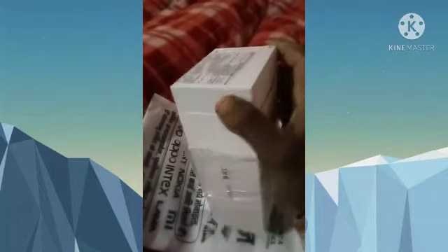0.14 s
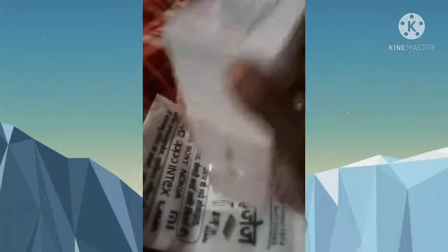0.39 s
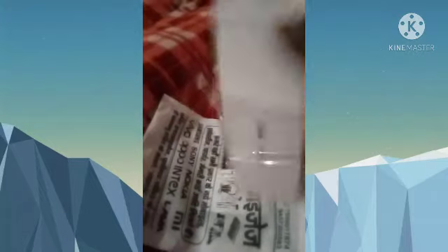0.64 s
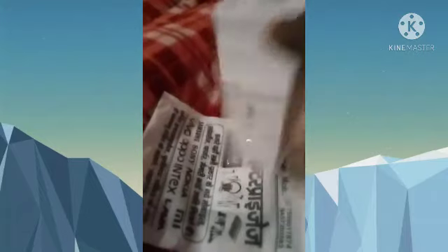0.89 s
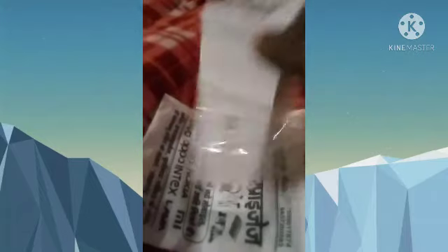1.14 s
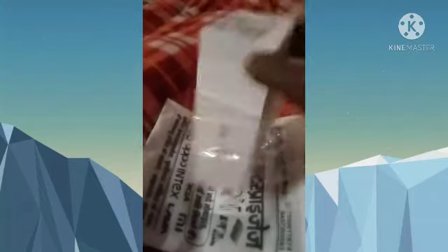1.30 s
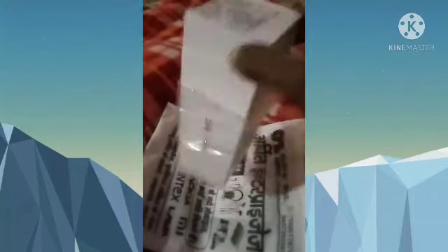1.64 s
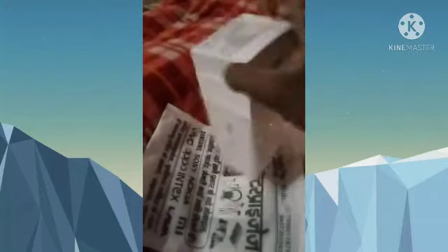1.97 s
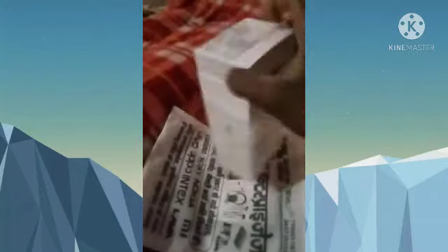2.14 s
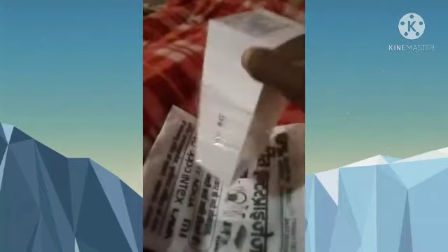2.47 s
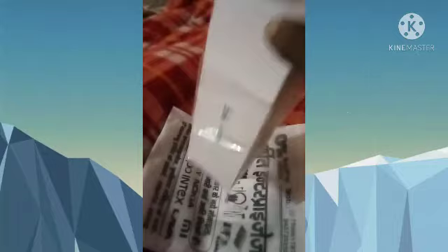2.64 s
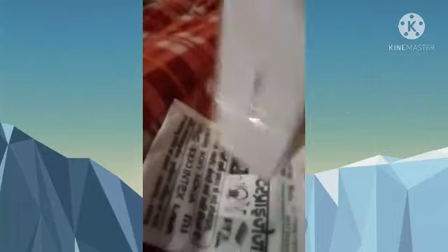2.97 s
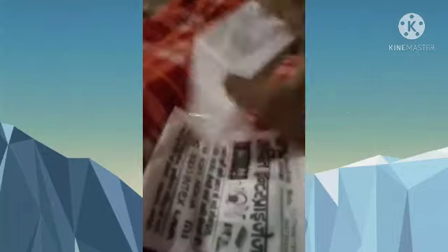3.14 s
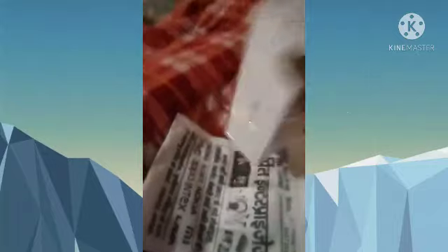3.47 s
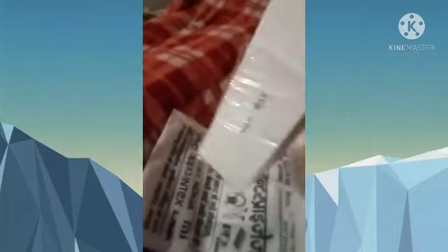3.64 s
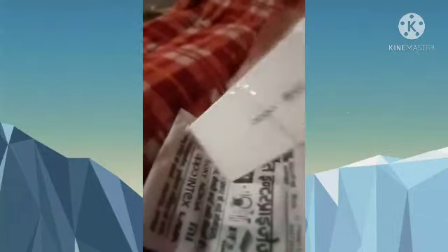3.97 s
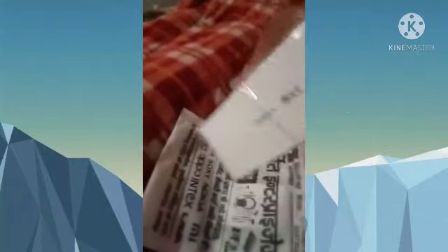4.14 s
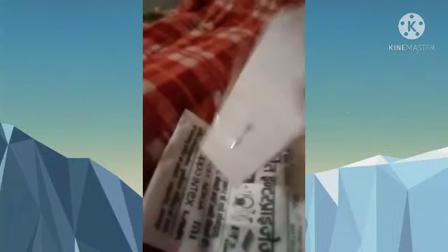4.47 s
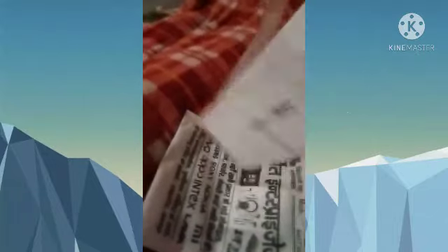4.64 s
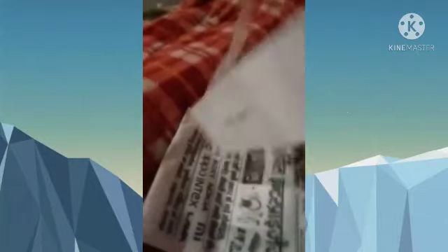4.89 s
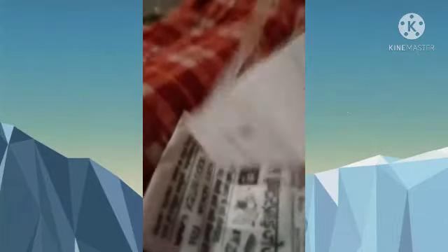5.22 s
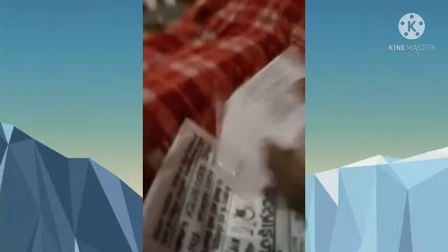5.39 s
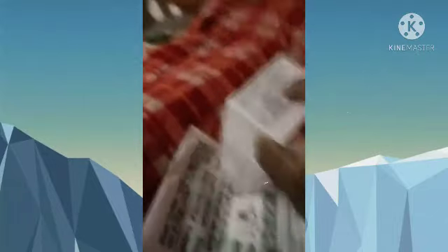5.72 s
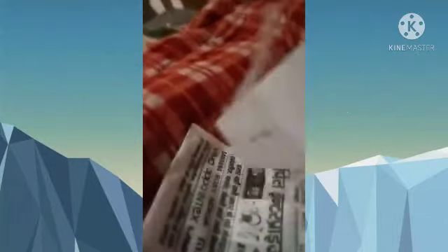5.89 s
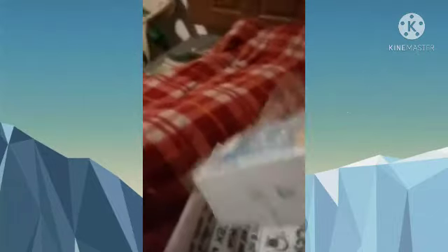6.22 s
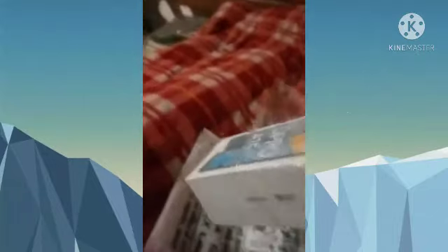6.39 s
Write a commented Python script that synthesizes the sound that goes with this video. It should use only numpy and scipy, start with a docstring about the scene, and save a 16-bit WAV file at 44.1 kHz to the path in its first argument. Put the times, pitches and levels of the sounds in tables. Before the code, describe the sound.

Plastic wrap snaps and crackles sharply as a small box is turned, then its contents knock and rattle in quick hollow shakes, close up indoors.

```python
"""A small cardboard box in plastic wrap is turned and shaken over a newspaper, close by in a small room.
Snaps of the taut wrap are short gliding sines with a noise crack and a tap on the box.
Shaken contents hit the wall: noise bursts drive the box modes and coloured slap, clack and rattle.
Wrap and paper rustle as flickering noise and clicks, with room echoes over a faint steady noise floor."""
import sys
import numpy as np
from scipy import signal
from scipy.fft import rfft, irfft
from scipy.io import wavfile
from scipy.ndimage import uniform_filter1d

SR = 44100
rng = np.random.default_rng(int(sys.argv[2]) if len(sys.argv) > 2 else 0)


def put_to_file(sound):
    """Save the sound as 16-bit audio at rate SR, in the file named by the first command-line argument."""
    columns = np.atleast_2d(sound).T  # one column per channel
    safe = np.clip(columns, -1, 1)
    whole_steps = np.round(safe * 32767)
    wavfile.write(sys.argv[1], SR, whole_steps.astype(np.int16))


N = 289724
TIME = np.arange(N) / SR
AGE = TIME[:4096]   # time since a contact


# Loud snaps of the wrap, levels before trim: (time [s], ring peak level [dB], mid-glide ring frequency [Hz],
# box tap level [dB], crack level [dB], ring decay time before its floor in facet [s])
WRAP_SNAPS = [(0.2533, -30, 3180, -65, -44.5, .0008), (0.406, -28, 3100, -51, -45, 0.00039),
              (0.449, -34, 3300, -44, -48, .0009), (0.5117, -35, 3060, -46, -42, 0.00098),
              (0.6095, -24.5, 3070, -51, -47, 0.00069), (0.622, -22, 2970, -29, -25.5, .0008),
              (0.7471, -19, 3040, -34, -29.5, 0.00089), (0.8129, -3.5, 3230, -21, -10, 0.0019),
              (0.9073, -18, 3070, -30, -42, .0008), (0.9785, -19, 3360, -55, -54, 0.00099),
              (0.9956, -22, 2960, -35, -32, .0009), (1.0008, -10, 2940, -19.5, -8.5, 0.00085),
              (1.077, -17.5, 3210, -51, -35, .0006), (1.0835, -12.5, 3350, -18, -35, .0009),
              (1.1475, -4, 3155, -31, -26, 0.0011), (1.2258, -11, 3320, -18.5, -25.5, .0008),
              (1.287, -14, 3360, -41, -55, 0.00075), (1.3012, -6, 3090, -27, -52, 0.0016),
              (1.311, -9, 3190, -21.5, -18.5, 0.00089), (1.3302, -22, 3380, -37, -30, .0009),
              (1.354, -16, 2650, -28.5, -55, .0005), (1.3839, -24, 3100, -29, -55, 0.00045),
              (1.4678, -5.5, 3270, -26.5, -30, 0.00033), (1.5237, -25, 3420, -38.5, -54, 0.0007),
              (1.5569, -28.5, 3630, -52, -56, 0.001), (1.5906, -25, 3390, -40, -59, 0.0015),
              (1.7628, -27.5, 3110, -41, -63, 0.00067), (1.862, -12, 3010, -28.5, -37, 0.00047),
              (1.9603, -17, 3250, -29, -55, .0005), (2.0433, -5, 2700, -18, -34, 0.0022),
              (2.0467, -5, 3060, -38, -16, 0.0014), (2.1327, -12.5, 3270, -23, -54, 0.0019),
              (2.2023, 0.5, 3110, -25, -15.5, 0.0011), (2.2423, -20.5, 2630, -50, -30, 0.0008),
              (2.2894, -9, 2870, -29, -58, 0.00027), (2.358, -16, 3030, -42.5, -41, 0.00073),
              (2.3657, -2.5, 3210, -22, -18.5, 0.00083), (2.3688, -4, 3290, -28, -26, 0.00068),
              (2.4566, -11, 3310, -27.5, -60, 0.00081), (2.5499, -8.5, 2610, -37, -61, 0.00085),
              (2.5545, -18, 2810, -29, -22, .001), (2.659, -26.5, 3270, -42, -79, .001),
              (2.9014, -31, 3720, -24, -32, 0.0007), (2.9316, -3, 2780, -13, -13.5, 0.00078),
              (2.996, -6.5, 3090, -22, -29, 0.00061), (3.1661, -24, 3100, -36, -28, 0.0011),
              (3.2142, -4, 2660, -15, -10, 0.00064), (3.2834, -14, 2350, -45, -27, 0.00031),
              (3.2966, -12, 2820, -24.5, -44, 0.00036), (3.4539, -2, 3090, -16.5, -21, 0.00083),
              (3.8708, -35, 3200, -47, -62, .0007), (5.7699, -14.5, 2940, -29.5, -13.5, 0.00091),
              (6.0854, -5.5, 1850, -18.5, -15.5, 0.0021)]
# Colour of the tap on the box: (frequency [Hz], gain [dB])
TAP_COLOUR = [(70, -21), (150, -5), (230, 4), (310, 2.5), (420, 8), (540, -6.5), (830, 1), (1200, -8.5),
              (1650, -4), (2300, -8.5), (4500, -41.5)]
# Colour of the cracking crease: (frequency [Hz], gain [dB])
CRACK_COLOUR = [(1500, -18.5), (3200, 9), (4200, 8.5), (5100, -7), (5900, 1.5), (6500, -2.5), (7300, 3),
                (8300, -6), (9500, -13), (13000, -21.5), (15000, -21)]


def snaps(rows, ring_trim_db, tap_trim_db, crack_trim_db, rough, rebound):
    """A facet of wrap buckles and springs back; the crease cracks and taps the box."""
    time_s, ring_db, ring_hz, tap_db, crack_db, decay_s = columns(rows)
    detune, lag_s = columns(rng.uniform([.8, .001], [1.1, .0025], (len(time_s), 2)))

    crease = peak_one(band(burst(time_s, decay_s=0.0036, rise_s=.0003), 2350, 3440))
    buckle = facet(ring_hz, decay_s, delay_s=0)
    spring_back = facet(ring_hz * detune, decay_s, lag_s)
    ring = from_db(ring_db + ring_trim_db) * peak_one(buckle + rebound * spring_back + rough * crease)

    crack = colour(burst(time_s, decay_s=0.00096, rise_s=0.00036), CRACK_COLOUR)
    tap = colour(burst(time_s, decay_s=0.0092, rise_s=0.00043), TAP_COLOUR)
    contact = at_level(crack, crack_db + crack_trim_db) + at_level(tap, tap_db + tap_trim_db)
    return place(time_s, ring + contact)


def facet(hz, decay_s, delay_s, glide=0.14):
    """A buckling facet of wrap swings for a few cycles, dropping in pitch as it slackens."""
    age_s = np.maximum(AGE - delay_s, 0)
    attack = 1 - np.exp(-(age_s / 0.00079) ** 2)
    swing = attack * np.exp(-age_s / np.maximum(decay_s, 3e-4))
    pitch_hz = hz * (1 + glide * (2 * np.exp(-age_s / 0.0016) - 1))
    return peak_one(swing) * np.sin(2 * np.pi * np.cumsum(pitch_hz, axis=1) / SR)


TURNING_S = (.4, 2.7)   # from, to
CRINKLES_PER_S, CRINKLE_HZ, CRINKLE_DECAY_S = 16, 3187, 0.00061
CRINKLE_OVER_RUSTLE_DB, CRINKLE_SPREAD_DB = 11, 3
CRINKLE_TAP_DB, CRINKLE_CRACK_DB = -18, -12   # relative to the ring, before trim


def crinkles(rustle_db):
    """Small snaps under the turning fingers, as rows like WRAP_SNAPS."""
    level_db = rustle_db + CRINKLE_OVER_RUSTLE_DB
    time_s, db = scatter(*TURNING_S, CRINKLES_PER_S, level_db, CRINKLE_SPREAD_DB)
    hz = CRINKLE_HZ * rng.uniform(.88, 1.12, len(time_s))
    decay_s = np.full(len(time_s), CRINKLE_DECAY_S)
    return np.column_stack([time_s, db, hz, db + CRINKLE_TAP_DB, db + CRINKLE_CRACK_DB, decay_s])


# Contents hit the wall, levels before trim: (time [s], wrap slap level [dB], wall thud level [dB],
# air boom level [dB], rattle level [dB], slap and rattle decay time [s])
WALL_KNOCKS = [(0.0217, -72, -39, -41, -77, 0.0052), (0.6837, -34.5, -27, -42, -38.5, 0.011),
               (1.4458, -40.5, -19.5, -29.5, -40, 0.0099), (2.9316, -2, -25.5, -36, -25.5, 0.0023),
               (3.2142, -0.5, -24, -43, -17.5, 0.0022), (3.311, -21.5, -14.5, -26.5, -54, 0.0041),
               (3.3291, -30, -23, -37, -56, 0.0094), (3.4285, -13.5, -10, -15, -52, 0.014),
               (3.4345, -19, -9, -30, -36, 0.0017), (3.5072, -6.5, -27, -16, -37, 0.0076),
               (3.5184, -12, -7.5, -21.5, -41, .0025), (3.5262, 2, -16.5, -19.5, -22, 0.002),
               (3.6105, -37, -25, -48, -52, .0025), (3.6557, -17, -20, -28, -36, 0.012),
               (3.7341, -18, -18.5, -42, -35, 0.0041), (3.7471, -19, -18.5, -29.5, -40, 0.0053),
               (4.1605, -39, -24, -50, -62, 0.017), (4.2358, -18.5, -19.5, -42, -35.5, 0.0049),
               (4.2524, -25, -24.5, -42, -58, 0.0027), (4.367, -25, -25.5, -33.5, -45, .003),
               (4.4265, -18, -18, -45, -25.5, 0.0052), (4.4421, 3, -13, -28, -22, 0.0024),
               (4.5002, -6, -20.5, -24, -21.5, 0.0052), (4.5998, -18, -24, -54, -44, 0.012),
               (4.7925, -11.5, -10, -60, -25, 0.0055), (4.8065, 1, -13, -20.5, -22.5, 0.0066),
               (4.8659, -6.5, -12.5, -17.5, -23.5, .008), (4.8982, -17, -22, -36, -43, 0.0035),
               (4.9204, -17, -20, -38, -41, 0.01), (4.9626, -37, -19, -43, -56, 0.0028),
               (5.1014, -19.5, -24, -35, -26, 0.0018), (5.1172, 2, -7, -36, -17, 0.0049),
               (5.1755, -8, -16, -24.5, -28, 0.0084), (5.2066, -22, -19.5, -28, -47, 0.0038),
               (5.2293, -14, -18, -27, -37, 0.0056), (5.3993, 0.5, -10.5, -22, -14.5, 0.0047),
               (5.4615, -9, -17, -17, -27.5, .009), (5.4909, -14, -16.5, -22, -29, 0.0033),
               (5.5323, -18.5, -16, -38, -44, 0.0066), (5.5737, -18.5, -23, -43, -37.5, 0.0042),
               (5.7699, -1, -9, -22, -17.5, 0.0043), (5.8211, -10, -12, -19, -30, 0.011),
               (5.896, -10.5, -14.5, -35, -36, 0.0043), (6.044, -20, -23, -32.5, -47, 0.0027),
               (6.0616, -18.5, -12.5, -23, -43, 0.02), (6.1316, -12.5, -13, -21.5, -27, 0.013),
               (6.1927, -17.5, -16, -28, -39, 0.0042), (6.2162, -8.5, -21.5, -26, -31.5, 0.0041)]
# Box walls: (frequency [Hz], width [Hz], mean level [dB])
WALL_MODES = [(204.7, 32, -6), (279.4, 34.5, -3), (330, 15, 0.5), (382.4, 24, 1), (431, 27.3, -3.5),
              (585, 14.3, -13.5)]
# Air inside the box: (frequency [Hz], width [Hz], mean level [dB])
AIR_MODES = [(145, 26, -2)]
# Colour of the slapping wrap: (frequency [Hz], gain [dB])
SLAP_COLOUR = [(900, -12), (1900, -13), (2400, 0), (3100, -1), (3900, -5.5), (5000, -25.5), (8000, -44.5)]
# Colour of the clacking card: (frequency [Hz], gain [dB])
CLACK_COLOUR = [(300, -12), (560, 1.5), (690, -2.5), (830, 5), (1000, -1.5), (1230, -7.5), (1700, 4.5),
                (2000, -3.5), (2800, -4), (5000, -75)]
# Colour of the loose parts: (frequency [Hz], gain [dB])
RATTLE_COLOUR = [(1500, -35), (3200, -9.5), (4200, 11.5), (5100, -0.5), (5900, 1), (6500, 2.5), (7300, 9),
                 (8300, -5.5), (9500, -36), (13000, -43), (15000, -25)]
CLACK_PER_SLAP, CLACK_PER_THUD = 0.56, .38   # dB per dB


def knocks(rows, slap_trim_db, clack_trim_db, thud_trim_db, boom_trim_db, rattle_trim_db):
    """The contents hit the wall: the wrap slaps, the card clacks, walls and air resound, loose parts rattle."""
    time_s, slap_db, thud_db, boom_db, rattle_db, decay_s = columns(rows)
    clack_db = CLACK_PER_SLAP * slap_db + CLACK_PER_THUD * thud_db

    slap = colour(burst(time_s, decay_s, rise_s=0.0013), SLAP_COLOUR)
    clack = colour(burst(time_s, 1.3 * decay_s, rise_s=0.00081), CLACK_COLOUR)
    thud = box(burst(time_s, decay_s=0.0028, rise_s=0.00027), WALL_MODES)
    boom = box(burst(time_s, decay_s=0.0042, rise_s=0.0008), AIR_MODES)
    rattle = colour(burst(time_s, decay_s, rise_s=0.00036), RATTLE_COLOUR)

    blow = at_level(slap, slap_db + slap_trim_db) + at_level(clack, clack_db + clack_trim_db)
    blow = blow + at_level(thud, thud_db + thud_trim_db) + at_level(boom, boom_db + boom_trim_db)
    return place(time_s, blow + at_level(rattle, rattle_db + rattle_trim_db))


def box(push, modes, vary_db=5.0):
    """The box rings in its low modes, each as strongly as the place of the push allows."""
    # a small box radiates little bass
    push = signal.sosfilt(signal.butter(2, 105, "high", fs=SR, output="sos"), push)
    out = 0
    for k, (hz, width_hz, db) in enumerate(modes):
        radius = np.exp(-np.pi * width_hz / SR)
        poles = [1, -2 * radius * np.cos(2 * np.pi * hz / SR), radius ** 2]
        ring = signal.lfilter([1 - radius, 0, radius - 1], poles, push)
        coupling = rng.uniform(-1, 1, push.shape[:-1] + (1,))   # random place of each push
        out = out + (-1) ** k * from_db(db + vary_db * coupling) * ring
    return out


SHAKING_S = (3.3, 6.4)   # from, to
BUMPS_PER_S, BUMP_SPREAD_DB, BUMP_DECAY_S = 10, 6, 0.0064
# relative to the rumble, before trim
BUMP_SLAP_DB, BUMP_THUD_DB, BUMP_BOOM_DB, BUMP_RATTLE_DB = 2.5, 3, -10.5, -5


def bumps(rumble_db):
    """Light bumps of the sliding contents, as rows like WALL_KNOCKS."""
    time_s, db = scatter(*SHAKING_S, BUMPS_PER_S, rumble_db, BUMP_SPREAD_DB)
    levels_db = db[:, None] + [BUMP_SLAP_DB, BUMP_THUD_DB, BUMP_BOOM_DB, BUMP_RATTLE_DB]
    return np.column_stack([time_s, levels_db, np.full(len(time_s), BUMP_DECAY_S)])


# Colour of paper and wrap: (frequency [Hz], gain [dB])
RUSTLE_COLOUR = [(300, -19), (560, -6), (830, 0.5), (1250, 2.5), (1700, -5.5), (2050, 6.5), (3000, 2.5),
                 (3800, -1), (4600, -13.5), (5400, -23), (8000, -69)]
# Colour of the wrap's hiss: (frequency [Hz], gain [dB])
HISS_COLOUR = [(2820, -23), (4800, -13.5), (6050, -14), (6900, 0.5), (7440, -2), (8110, -9), (10100, -20),
               (14900, -18), (16000, -4.5)]


def rubbing(levels_db, rumble_trim_db, rustle_trim_db, hiss_trim_db, crease_db):
    """The contents slide in the box; paper and wrap drag under the fingers and small creases give way in clumps."""
    rumble_gain, rustle_gain, hiss_gain = from_db(levels_db)
    grip = flutter(spread_db=4.0, rate_hz=170)
    drag = grip * rng.standard_normal(N)

    sliding = box(drag, WALL_MODES) + 0.99 * box(drag, AIR_MODES) + 0.59 * band(drag, 76, 726)
    rumble = from_db(rumble_trim_db) * rumble_gain * rms_one(sliding)

    clicks = [band(grains(per_s=110, spread_db=5.0), hz / 1.25, hz * 1.25)
              for hz in np.geomspace(900, 3600, 6)]
    creases = grip * sum(clicks)
    paper_and_wrap = rms_one(drag) + from_db(crease_db) * rms_one(creases)
    rustle = from_db(rustle_trim_db) * rustle_gain * rms_one(colour(paper_and_wrap, RUSTLE_COLOUR))

    sizzle = grip * rms_one(grains(per_s=1500, spread_db=4.0))
    hiss = from_db(hiss_trim_db) * hiss_gain * rms_one(colour(drag + sizzle, HISS_COLOUR))
    return rumble + rustle + hiss


def flutter(spread_db, rate_hz):
    """A grip that catches and lets go many times a second, as a random gain."""
    grip = np.clip(rng.standard_normal(4000), -2, 2)
    return from_db(spread_db * np.interp(TIME * rate_hz, np.arange(len(grip)), grip))


def grains(per_s, spread_db):
    """Clicks of uneven size at random moments."""
    sizes = from_db(spread_db * np.minimum(rng.exponential(1, N), 3)) * rng.choice([-1, 1], N)
    return sizes * (rng.random(N) < per_s / SR)


# Finger drags, then shaking strokes, levels before sag and trim:
# (end of swell [s], hold [s], rustle level [dB], box rumble level [dB], wrap hiss level [dB])
HAND_MOVES = [(0.06, 0.3, -50.5, -52, -59), (0.24, 0.13, -49, -53, -57.5),
              (0.39, 0.38, -49.5, -53.5, -48.5), (0.61, 0.27, -38.5, -42.5, -46),
              (0.72, 0.45, -37, -36, -47), (1.23, 0.16, -35.5, -37.5, -43.5), (1.45, 0.39, -50, -47, -57.5),
              (1.88, 0.39, -42.5, -42.5, -53.5), (2.06, 0.3, -39, -38, -46.5),
              (2.38, 0.24, -44, -44, -52.5), (2.81, 0.19, -47.5, -55.5, -59.5), (2.94, 0.12, -32, -35, -40),
              (3.225, 0.15, -29.5, -41.5, -42), (3.43, 0.12, -24.5, -27, -39.5),
              (3.6, 0.17, -36.5, -33.5, -61), (3.79, 0.036, -44, -46, -70), (3.99, 0.12, -54, -77, -74),
              (4.16, .05, -37.5, -34.5, -65), (4.225, 0.017, -28, -31, -56),
              (4.41, 0.18, -27.5, -26.5, -42.5), (4.78, 0.18, -28.5, -30.5, -41),
              (5.092, 0.13, -25, -40, -39.5), (5.31, 0.15, -30, -33, -53), (5.385, 0.16, -25.5, -26.5, -41),
              (5.755, 0.14, -27.5, -29, -41), (6.05, 0.16, -28, -30, -48), (6.27, 0.026, -37.5, -39, -68)]
SWELL_DB_PER_S, RELEASE_DB_PER_S = 630, 178.5
SAG_DB, HISS_SAG_DB = 5, 13   # over the hold


def move_levels():
    """Rumble, rustle and hiss levels [dB]: moves swell, sag and die away; the strongest counts."""
    clock_s = TIME[::64]
    start_s, hold_s, rustle_db, rumble_db, hiss_db = columns(HAND_MOVES)
    age_s = clock_s - start_s
    swell_db = -SWELL_DB_PER_S * np.maximum(-age_s, 0)
    release_db = -RELEASE_DB_PER_S * np.maximum(age_s - hold_s, 0)
    spent = np.clip(age_s / hold_s, 0, 1)
    layers_db = [rumble_db - SAG_DB * spent, rustle_db - SAG_DB * spent, hiss_db - HISS_SAG_DB * spent]
    return [np.interp(TIME, clock_s, (db + swell_db + release_db).max(axis=0)) for db in layers_db]


# Reflections by band: (low edge [Hz], high edge [Hz], initial level before normalising [dB], t60 [s])
ROOM_BANDS = [(59.2, 400, -1, 0.37), (547, 1750, -0.5, 0.46), (2460, 3430, -0.5, 0.23),
              (5000, 9600, -0.5, 0.27)]


def room(x, build_s):
    """Reflections build up from the near walls and die away, the two upper bands faster."""
    age_s = TIME[:SR // 2]
    echoes = rng.standard_normal(len(age_s)) * (1 - np.exp(-(age_s / build_s) ** 2))
    tail = sum(from_db(db - 60 * age_s / t60_s) * band(echoes, low_hz, high_hz)
               for low_hz, high_hz, db, t60_s in ROOM_BANDS)
    return signal.fftconvolve(x, tail / np.linalg.norm(tail))[:N]


# Colour of the background: (frequency [Hz], gain [dB])
FLOOR_COLOUR = [(15, -51.5), (25, -1), (134, 3), (775, -12.5), (1370, -10.5), (2000, -9), (3430, -13.5),
                (4870, -39), (7110, -20), (10100, -36), (14800, -31), (16000, -27)]
FLOOR_DB = -57.5   # rms, ahead of the microphone


def background():
    """Faint steady coloured noise."""
    return from_db(FLOOR_DB) * rms_one(colour(rng.standard_normal(N), FLOOR_COLOUR))


def burst(times, decay_s, rise_s):
    """Each contact is a rush of tiny collisions that dies away, as shaped noise."""
    noise = rng.standard_normal((len(times), len(AGE)))
    return noise * np.exp(-AGE / np.maximum(decay_s, 2e-4)) * (1 - np.exp(-AGE / rise_s))


def scatter(start_s, end_s, per_s, level_db, spread_db, count=96):
    """Small contacts at uneven moments, each about as strong as the move is then: (times, dB)."""
    when, size = rng.random((count, 2)).T
    time_s = start_s + (np.arange(count) + when) / per_s
    db = np.interp(time_s, TIME, level_db) + spread_db * (2 * size - 1)
    return time_s[time_s < end_s], db[time_s < end_s]


def columns(table):
    """Columns of an event table, one row per event."""
    return np.array(table, float).T[:, :, None]


def place(times, sounds):
    """Lay short sounds out in time."""
    out = np.zeros(N + len(AGE))
    for start, sound in zip(np.round(times[:, 0] * SR).astype(int), sounds):
        out[start:start + len(sound)] += sound
    return out[:N]


def colour(x, points, size=2048):
    """Causal (minimum-phase) filter with the given spectrum."""
    hz, db = np.transpose(points)
    grid_hz = np.maximum(np.arange(size // 2 + 1) * SR / size, 1)
    gain = from_db(np.interp(np.log(grid_hz), np.log(hz), db))
    cepstrum = irfft(np.log(gain))[:size // 2]
    cepstrum[1:] *= 2   # fold to minimum phase
    response = np.array(irfft(np.exp(rfft(cepstrum, size))), ndmin=x.ndim)
    return signal.oaconvolve(x, response, axes=-1)[..., :x.shape[-1]]


def band(x, low_hz, high_hz):
    """Band-pass."""
    edges_hz = [low_hz, min(high_hz, 20000)]
    return signal.sosfilt(signal.butter(2, edges_hz, "band", fs=SR, output="sos"), x)


def from_db(db):
    """Decibels to gain."""
    return 10 ** (np.asarray(db) / 20)


def rms_one(x):
    """Scale to unit rms."""
    return x / np.sqrt(np.mean(x ** 2) + 1e-20)


def peak_one(x):
    """Scale each blow to unit peak."""
    return x / abs(x).max(axis=1, keepdims=True)


def at_level(x, db):
    """Scale each blow so that its loudest few milliseconds have this rms level."""
    loudest = uniform_filter1d(x ** 2, size=256).max(axis=1, keepdims=True)
    return from_db(db) * x / np.sqrt(loudest + 1e-20)


def scene():
    """Wrap, box and rubbing in the room, over a faint steady background."""
    rumble_db, rustle_db, hiss_db = move_levels()
    wrap = snaps(np.vstack([WRAP_SNAPS, crinkles(rustle_db)]),
                 ring_trim_db=-2.0, tap_trim_db=-2.5, crack_trim_db=-3.0, rough=0.5, rebound=.44)
    blows = knocks(np.vstack([WALL_KNOCKS, bumps(rumble_db)]), slap_trim_db=-13.0, clack_trim_db=-8.5,
                   thud_trim_db=-4.0, boom_trim_db=-1.5, rattle_trim_db=-5.0)
    rub = rubbing([rumble_db, rustle_db, hiss_db],
                  rumble_trim_db=-1.0, rustle_trim_db=-4.0, hiss_trim_db=-0.5, crease_db=-7)
    handling = wrap + blows + rub
    echoes = from_db(-15.0) * room(handling, build_s=0.0025)
    return (handling + echoes + background())[None]


MIC_LOW_HZ, OVERLOAD_DB, CUTOFF_HZ = 40, -1, 15700


def record(dry):
    """The microphone thins the deepest bass, the loudest peaks overload it; the top is cut."""
    thinned = signal.sosfilt(signal.butter(2, MIC_LOW_HZ, "high", fs=SR, output="sos"), dry)
    clipped = np.clip(thinned, -from_db(OVERLOAD_DB), from_db(OVERLOAD_DB))
    return signal.sosfilt(signal.ellip(12, .1, 110, CUTOFF_HZ, fs=SR, output="sos"), clipped)


dry = scene()
out = record(dry)
put_to_file(out)
```